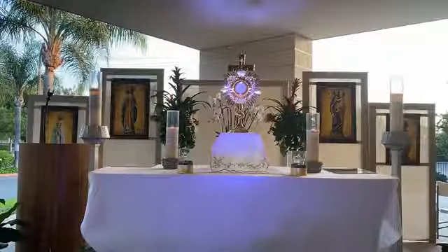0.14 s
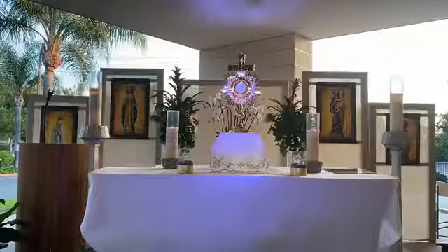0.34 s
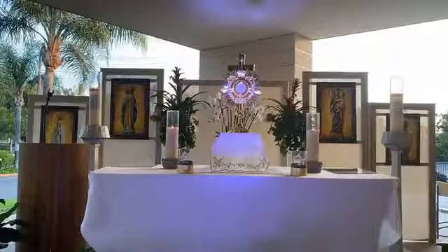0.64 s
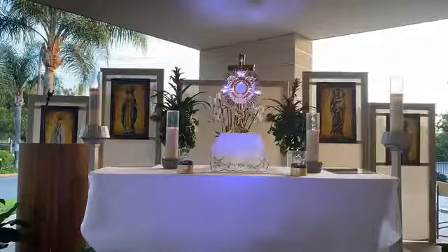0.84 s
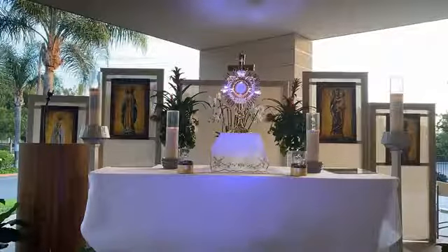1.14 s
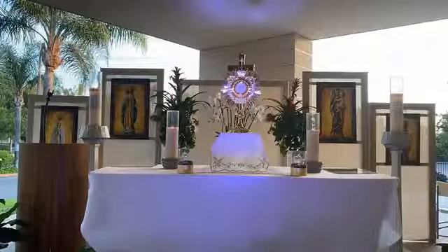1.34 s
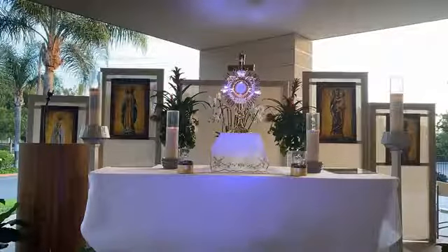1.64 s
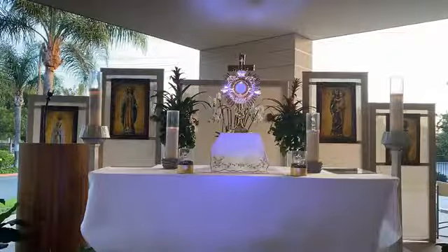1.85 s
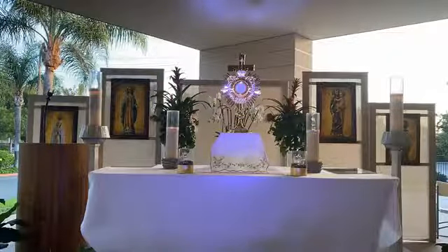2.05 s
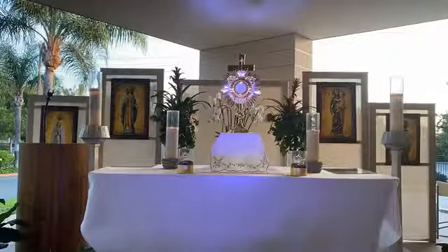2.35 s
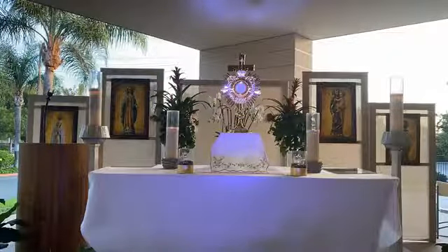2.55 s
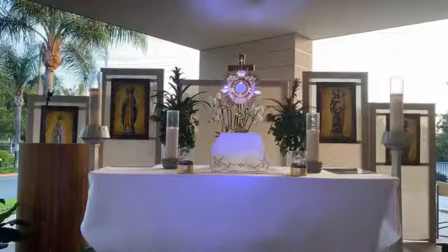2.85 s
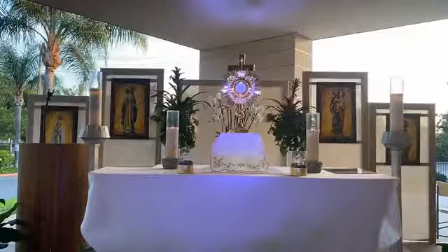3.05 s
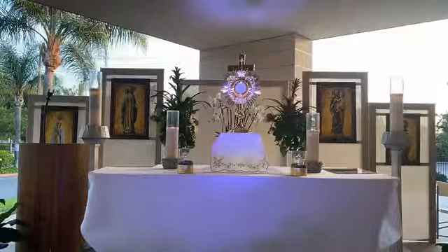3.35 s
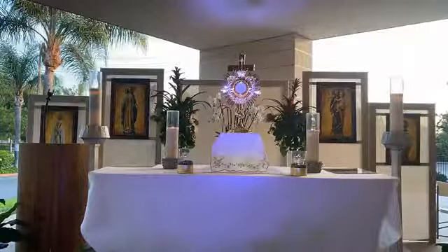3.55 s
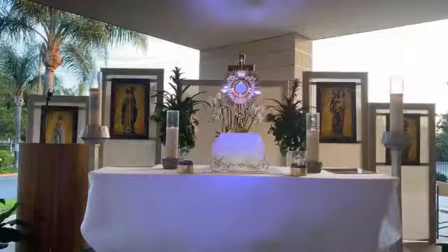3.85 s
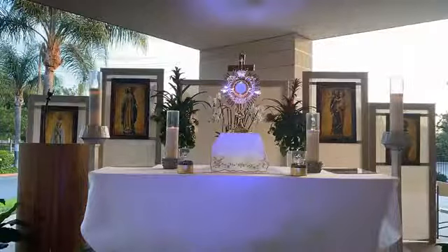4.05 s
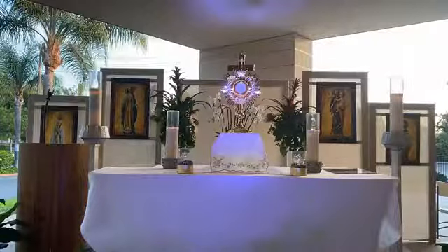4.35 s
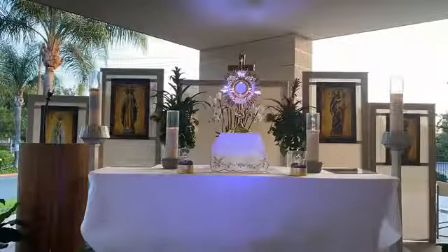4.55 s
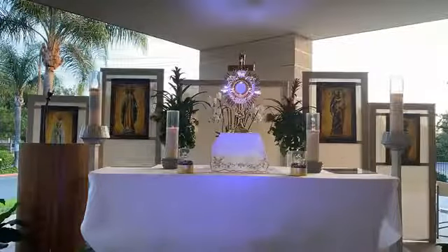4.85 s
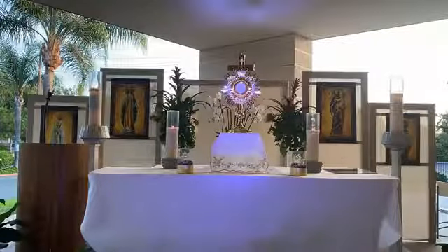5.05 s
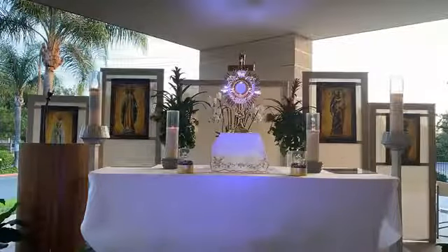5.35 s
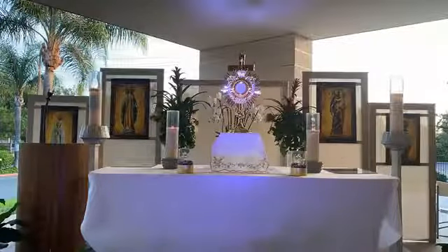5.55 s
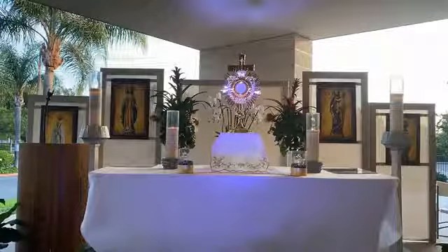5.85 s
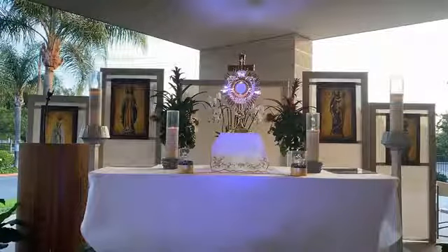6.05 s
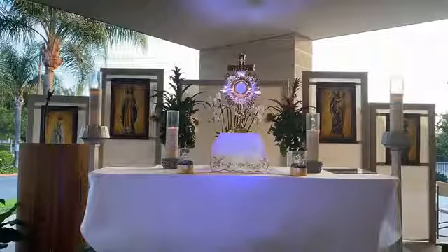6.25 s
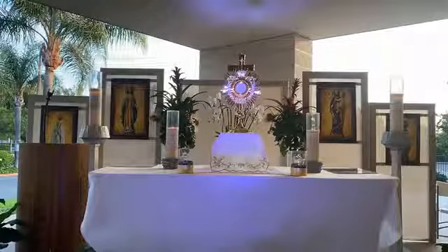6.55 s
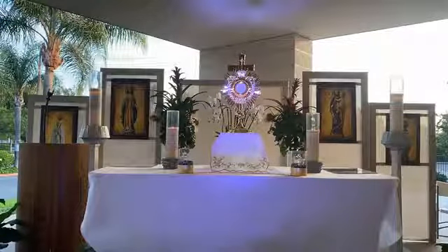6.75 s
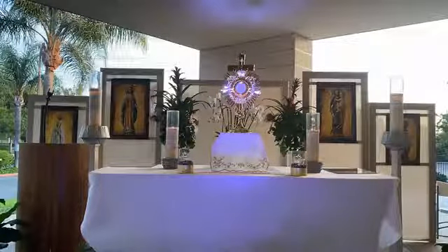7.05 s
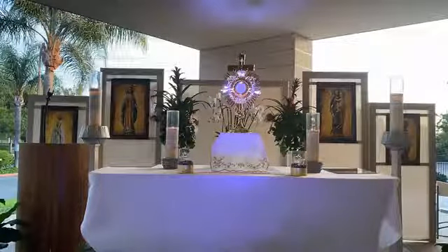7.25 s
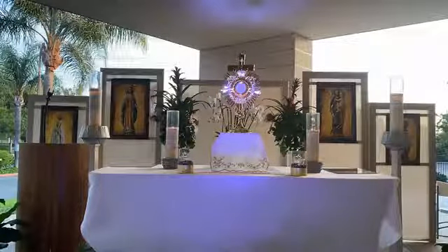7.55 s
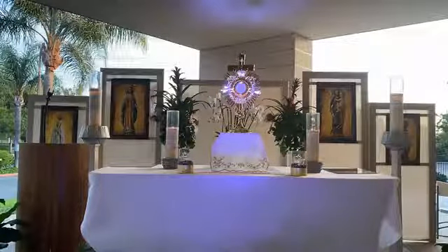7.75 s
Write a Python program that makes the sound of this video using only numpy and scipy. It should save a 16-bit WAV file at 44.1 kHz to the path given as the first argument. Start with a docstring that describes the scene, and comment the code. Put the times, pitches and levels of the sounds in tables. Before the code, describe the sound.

Steady hiss and low roar of distant traffic under an open porch, with faint motor hum, a car droning off, and soft wind rumble.

```python
"""Under an open porch, far traffic makes an even hiss and roar from coloured noise, while fans and motors hum.
In the first seconds a car drones by with sinking pitch, made from two wavering tones; one motor fades away
and comes back, and the thin tones of farther engines come and go throughout.
A breeze makes a very deep rumble of slow noise at the microphone, strongest at about 5.5 s.
From 4.2 s the traffic slowly fades, its treble fastest."""
import sys
import numpy as np
from scipy import signal
from scipy.fft import rfft, irfft
from scipy.io import wavfile

SR = 44100
rng = np.random.default_rng(int(sys.argv[2]) if len(sys.argv) > 2 else 0)


def persist_wave(psi):
    """Save psi, clipped to +-1, as 16-bit WAV."""
    counts = np.round(np.clip(psi, -1, 1) * 32767).astype(np.int16)
    wavfile.write(sys.argv[1], SR, np.atleast_2d(counts).T)


N = 347949


def from_db(db):
    """Turn decibels into a gain."""
    return 10 ** (np.asarray(db) / 20)


def rms_one(x):
    """Scale to an rms (average strength) of 1."""
    return x / np.sqrt(np.mean(x ** 2) + 1e-20)


def seconds():
    """Time of every sample."""
    return np.arange(N) / SR


def bin_hz():
    """Frequency of every bin of a full-length spectrum, kept above zero."""
    return np.maximum(np.fft.rfftfreq(N, 1 / SR), 1e-3)


def drift(rate_hz):
    """Slow random wandering with spread 1, changing about rate_hz times a second."""
    spectrum = rfft(rng.standard_normal(N))
    slow = irfft(spectrum / (1 + (bin_hz() / rate_hz) ** 2), N)
    return rms_one(slow - slow.mean())


def noise(colour):
    """Noise of a given colour that falls away steeply past both ends; rms 1."""
    hz, level_db = np.transpose(colour)
    f = bin_hz()
    ends = np.minimum(f / hz[0], 1) ** 4 * np.minimum(hz[-1] / f, 1) ** 4
    gain = from_db(np.interp(np.log(f), np.log(hz), level_db)) * ends
    return rms_one(irfft(rfft(rng.standard_normal(N)) * gain, N))


def tone(hz, wander_hz, flutter_db):
    """A far tone: moving air makes its pitch wander and its level flutter; rms about 1."""
    pitch_hz = hz + wander_hz * drift(4.53)
    turns = np.cumsum(pitch_hz) / SR + rng.random()
    wave = np.sqrt(2) * np.sin(2 * np.pi * turns)
    return wave * from_db(flutter_db * drift(6.2))


def swells(rows):
    """Joint gain of several rounded pushes that rise and die away; their powers add."""
    power = 0
    for at_s, peak_db, width_s in rows:
        push = from_db(peak_db) / (1 + ((seconds() - at_s) / width_s) ** 2)
        power = power + push ** 2
    return np.sqrt(power)


def passing(at_s, peak_db, width_s):
    """Gain of a source going past: one over its distance."""
    return from_db(peak_db) / np.sqrt(1 + ((seconds() - at_s) / width_s) ** 2)


def traffic():
    """Many far tyres merge into a roar and a hiss; as they recede, air takes more of the treble."""
    # how strong the hiss is at each pitch: (frequency [Hz], relative level [dB per Hz])
    hiss_colour = [(700, -10), (950, 0.2), (1130, 3), (1290, -1.05), (1520, 0.6), (2600, -1.23), (3350, -3),
                   (3800, -1.5), (4450, -3.5), (4900, -8), (5150, -11.5), (6100, -14), (7000, -19.5),
                   (9900, -27.5), (10600, -32), (12400, -38), (15600, -46)]
    # how strong the roar is at each pitch: (frequency [Hz], relative level [dB per Hz])
    roar_colour = [(22, 1), (48, 6.5), (62, 4), (90, 5.5), (135, 3), (165, 2), (205, 4), (260, 1.5),
                   (290, 0.5), (325, 2.5), (380, 0.1), (510, -1), (600, 3), (680, -0.2), (780, 1.6),
                   (870, -4.5), (1100, -15)]
    hiss_db, roar_db = -54.5, -56.5   # before the fade
    recede_from_s, fade_db_per_s = 4.2, 0.26
    treble_start_db, treble_fade_db_per_s = -0.44, 0.5   # on top of the common fade

    receding_s = np.maximum(seconds() - recede_from_s, 0)
    fade_db = fade_db_per_s * receding_s
    hiss = noise(hiss_colour)
    treble = signal.sosfilt(signal.butter(1, 4500, "high", fs=SR, output="sos"), hiss)
    treble_gain = from_db(treble_start_db - treble_fade_db_per_s * receding_s)
    hiss = hiss + treble * (treble_gain - 1)   # turns only the treble down
    hiss = hiss * from_db(hiss_db - fade_db + 0.35 * drift(13))
    roar = noise(roar_colour) * from_db(roar_db - fade_db + 0.2 * drift(2.8))
    return hiss + roar


def porch(x):
    """Ceiling, pillar and floor scatter a short, dull tail that ripples the spectrum unevenly."""
    t60_s, wall_cut_hz, scatter_db = 0.12, 2500, -16.5   # t60: time to die away by 60 dB
    decay = np.exp(-np.log(1000) * np.minimum(seconds() / t60_s, 10))
    tail = rng.standard_normal(N) * decay
    scatter = rfft(tail / np.linalg.norm(tail)) / (1 + 1j * bin_hz() / wall_cut_hz)
    return irfft(rfft(x) * (1 + from_db(scatter_db) * scatter), N)


def machines():
    """Mains hum, a motor that fades and returns, and weaker fan tones; each level changes on its own."""
    # humming fans and motors that slowly wax and wane:
    # (pitch [Hz], mean level [dB], swing [dB], cycle [s], loudest at [s])
    hum = [(119.8, -67, 4.5, 9.3, 1.13), (224.3, -72, 0, 6, 2.7), (240, -63.2, 2.2, 6, 3.4),
           (255.6, -65.5, 1.5, 3.1, 4.2)]
    # weaker fan tones: (pitch [Hz], level [dB])
    fan_tones = [(77.5, -75), (201, -75), (272, -78)]
    # a motor's drone fades away and comes back: (time [s], level [dB])
    motor_level = [(0, -61), (1.5, -68.5), (3.5, -83), (5, -66), (6.1, -61), (7.9, -64)]
    motor_hz = 184

    strong = 0
    for hz, db, swing_db, cycle_s, loudest_s in hum:
        waxing = np.cos(2 * np.pi * (seconds() - loudest_s) / cycle_s)
        level = from_db(db + swing_db * waxing)
        strong = strong + level * tone(hz, wander_hz=0.085, flutter_db=0.84)
    weak = 0
    for hz, db in fan_tones:
        weak = weak + from_db(db) * tone(hz, wander_hz=0.67, flutter_db=3.5)
    motor_gain = from_db(np.interp(seconds(), *np.transpose(motor_level)))
    motor = motor_gain * tone(motor_hz, wander_hz=0.87, flutter_db=1.8)
    return strong + weak + motor


def vehicles():
    """A slowing car's exhaust note with its next half order, and the thin tones of farther engines."""
    # the car's firing rate drops, then sinks slowly: (time [s], rate [Hz])
    car_firing = [(0, 107), (.3, 104.7), (.55, 97.3), (1.1, 93), (2.4, 89.1), (3.4, 84.9)]
    # its exhaust swells under throttle: (time [s], peak level [dB], half-width [s])
    throttle = [(0.12, -60, 0.34), (.82, -56.5, 0.15), (1.12, -55, .14), (1.42, -56.5, .16),
                (2.07, -59, 0.31), (3.74, -60.5, 0.3)]
    # far engines droning and whining past: (nearest at [s], peak level [dB], half-width [s], pitch [Hz])
    far_engines = [(0.37, -69, 0.33, 120), (1.7, -72.5, 0.92, 553), (3.5, -69, 1.18, 346),
                   (2.94, -70, 0.48, 745), (2.7, -75, .35, 828), (5.6, -69, 1.44, 710.5),
                   (5.82, -65.5, 0.37, 94), (6.3, -72.5, 0.4, 334), (2.48, -66.5, 0.16, 201),
                   (6.6, -69, 0.33, 203), (1.15, -69, .4, 201)]

    firing_hz = np.interp(seconds(), *np.transpose(car_firing))
    exhaust = tone(firing_hz, wander_hz=2.61, flutter_db=2.5)
    # a weaker tone at one and a half times the firing rate
    half_order = from_db(-13.0) * tone(firing_hz * 3 / 2, wander_hz=2.74, flutter_db=0.5)
    far = 0
    for at_s, db, width_s, hz in far_engines:
        far = far + passing(at_s, db, width_s) * tone(hz, wander_hz=0.91, flutter_db=1.7)
    return swells(throttle) * (exhaust + half_order) + far


def breeze():
    """Slow pressure swings, with small eddies that grow steeply with the gust and rumble in the strongest."""
    # how strong the slow swings are at each pitch: (frequency [Hz], relative level [dB per Hz])
    breeze_colour = [(1, -1.5), (3, -2), (5, 2.5), (7, -5), (11, -19.5), (15, -32), (25, -47), (60, -60)]
    # how strong the small eddies are at each pitch: (frequency [Hz], relative level [dB per Hz])
    eddy_colour = [(10, -2), (15, 7), (20, 0), (30, -15), (50, -26), (120, -52)]
    # gusts on the microphone: (time [s], peak level [dB], half-width [s])
    gusts = [(0.58, -45, .1), (1.0, -44.5, 0.089), (1.33, -39.5, 0.15), (1.7, -39.5, 0.17),
             (2.02, -37.5, 0.11), (2.38, -36.5, 0.1), (2.73, -40, 0.12), (3.07, -34, 0.086),
             (3.52, -38, 0.051), (3.88, -38, 0.075), (4.3, -45, 0.15), (4.78, -32, 0.11),
             (5.14, -31.5, 0.033), (5.36, -35.5, 0.075), (5.54, -27.5, 0.075), (5.7, -31, .06),
             (5.93, -33, 0.18), (6.33, -40, 0.14), (6.9, -50.5, 0.37)]
    eddy_db, calm_eddy_db = -38.5, -76   # in the strongest gust; in calm air
    eddy_growth = 2   # dB gained per dB of gust

    gust = swells(gusts)
    gusty_eddies = from_db(eddy_db) * (gust / gust.max()) ** eddy_growth
    eddy_gain = from_db(calm_eddy_db) + gusty_eddies
    swing = signal.hilbert(noise(breeze_colour))
    # even out the swing's own strength, so that mainly the gust sets it
    swing = rms_one(swing.real / np.sqrt(np.abs(swing) ** 2 + 0.9))
    return gust * swing + eddy_gain * noise(eddy_colour)


def scene():
    """Everything as it reaches one microphone under the roof."""
    mix = porch(traffic()) + machines() + vehicles() + breeze()
    return mix[None, :]   # one channel


def record(dry):
    """The microphone adds a faint steady hiss; the top is cut steeply."""
    self_noise_db, cutoff_hz = -87, 15700
    dry = dry + from_db(self_noise_db) * rng.standard_normal(N)
    top_cut = signal.ellip(8, .05, 50, cutoff_hz, fs=SR, output="sos")
    return signal.sosfiltfilt(top_cut, dry, padlen=2000)


dry = scene()
out = record(dry)
persist_wave(out)
```